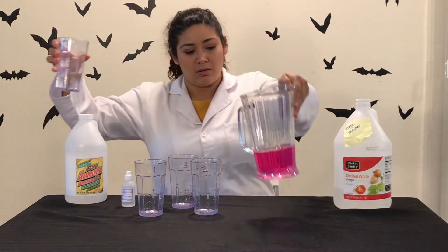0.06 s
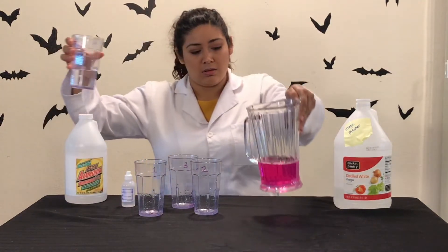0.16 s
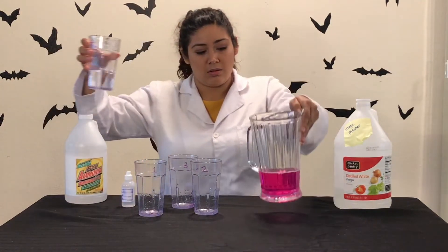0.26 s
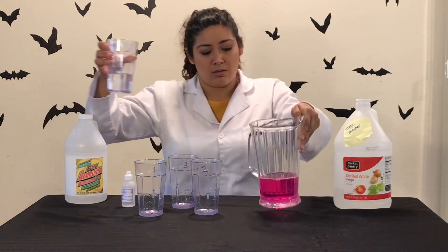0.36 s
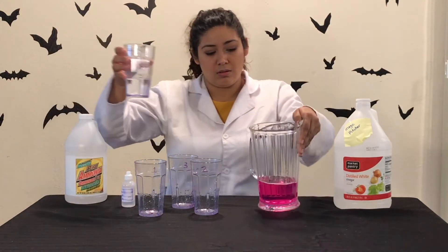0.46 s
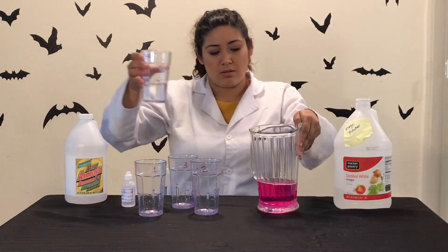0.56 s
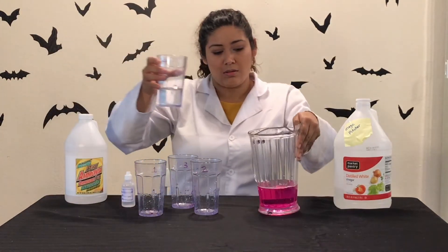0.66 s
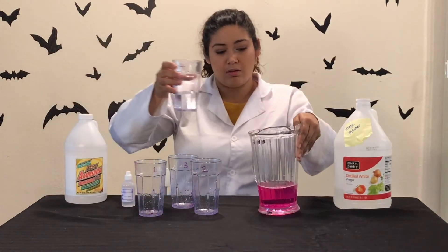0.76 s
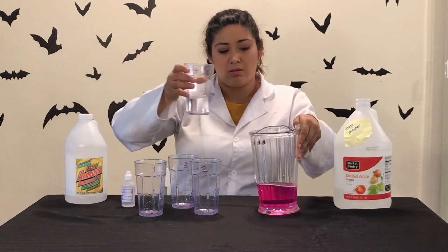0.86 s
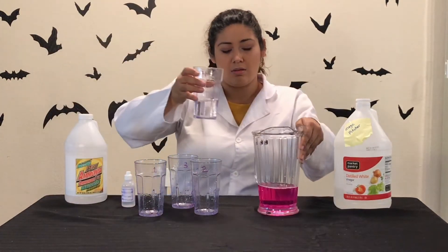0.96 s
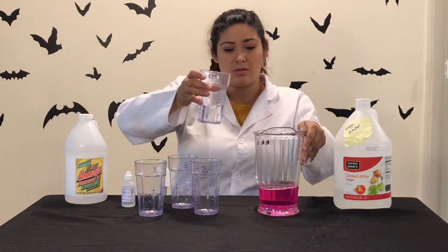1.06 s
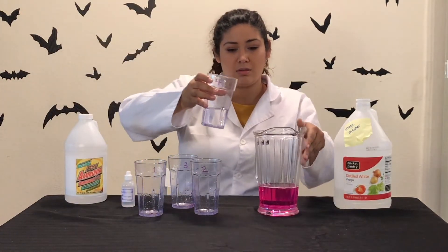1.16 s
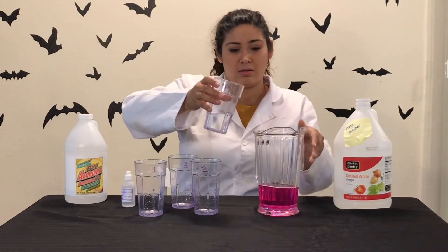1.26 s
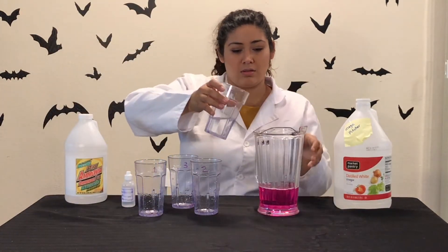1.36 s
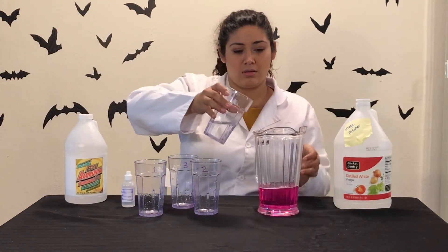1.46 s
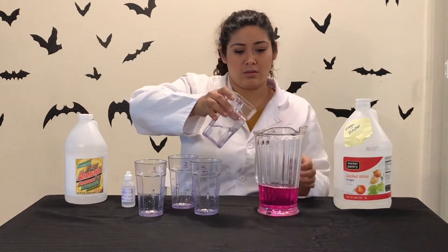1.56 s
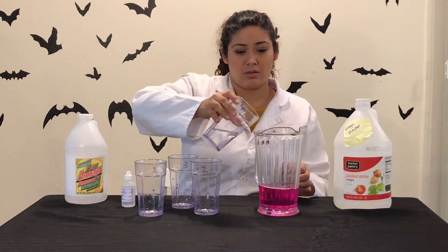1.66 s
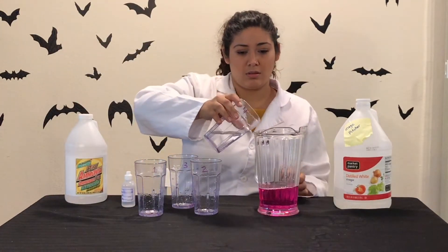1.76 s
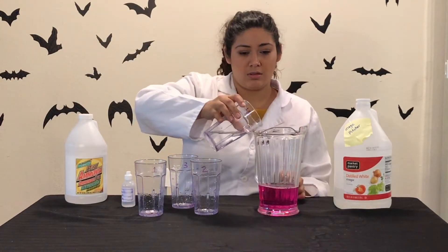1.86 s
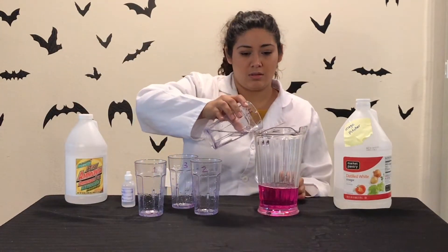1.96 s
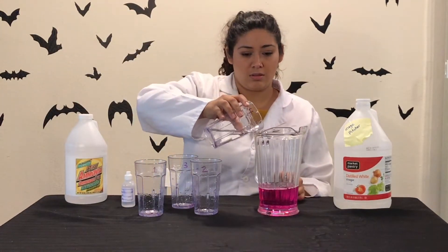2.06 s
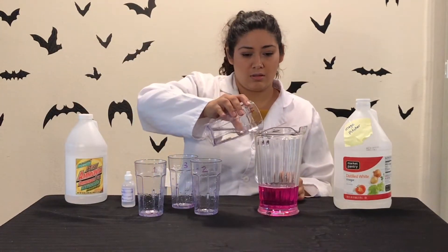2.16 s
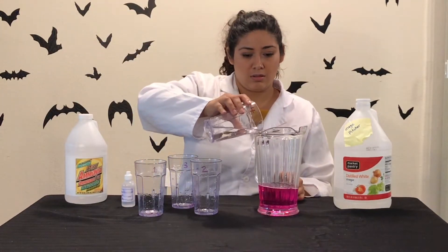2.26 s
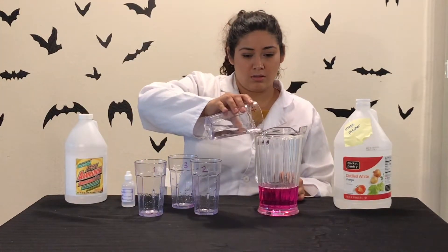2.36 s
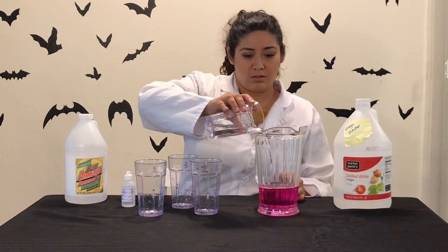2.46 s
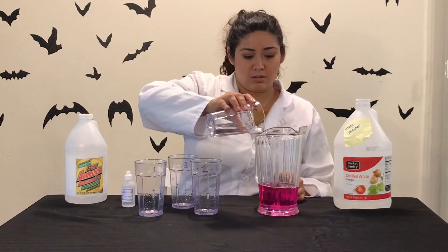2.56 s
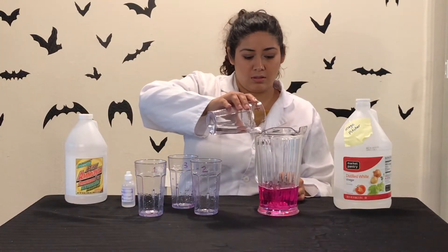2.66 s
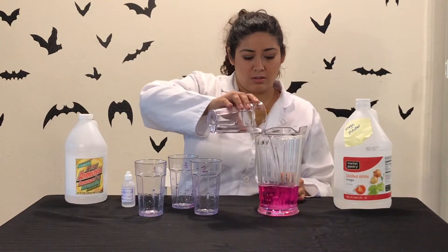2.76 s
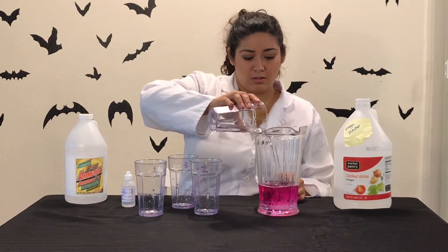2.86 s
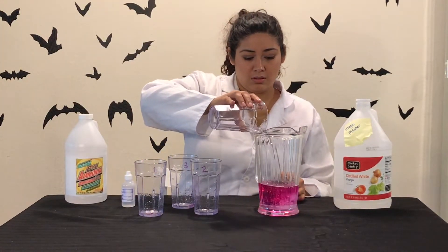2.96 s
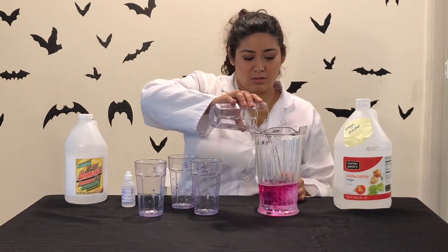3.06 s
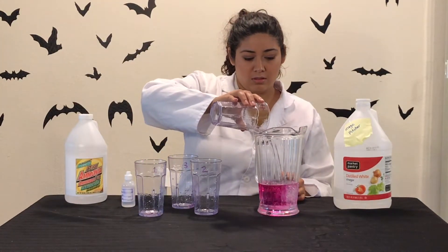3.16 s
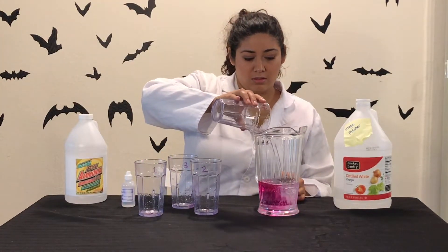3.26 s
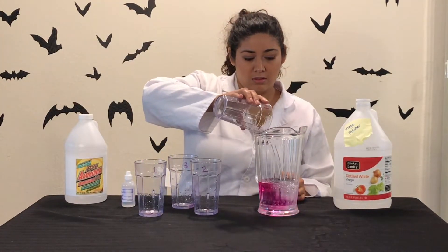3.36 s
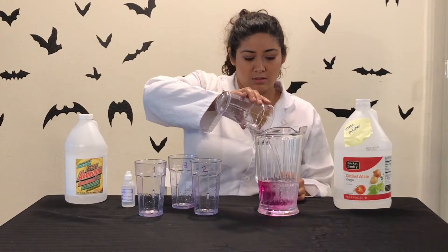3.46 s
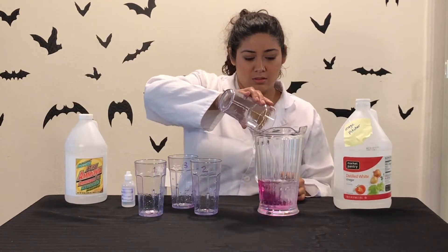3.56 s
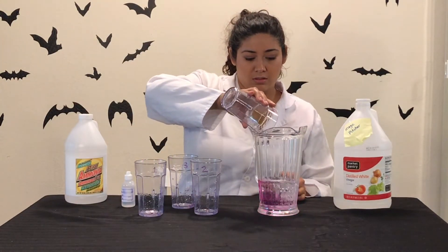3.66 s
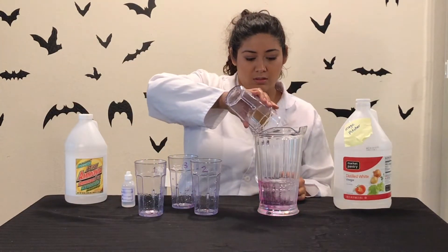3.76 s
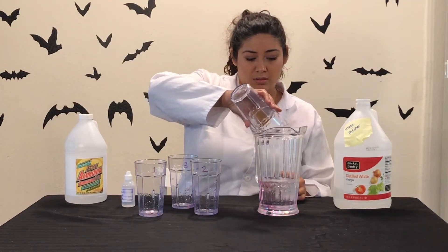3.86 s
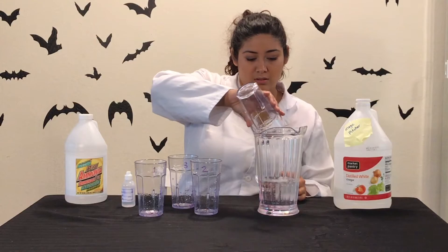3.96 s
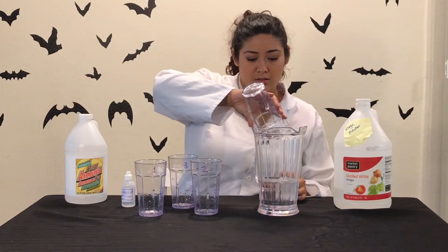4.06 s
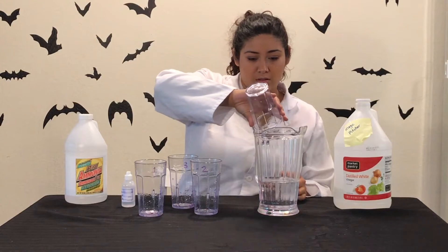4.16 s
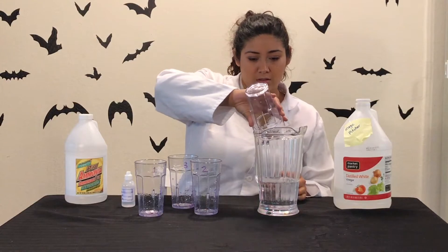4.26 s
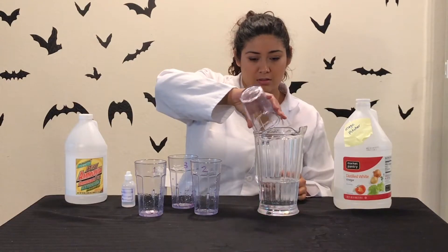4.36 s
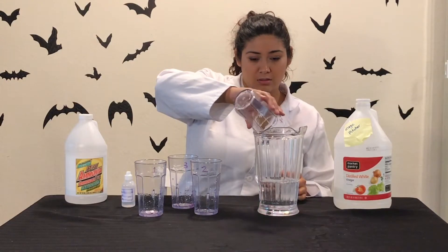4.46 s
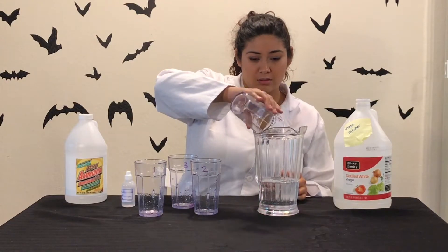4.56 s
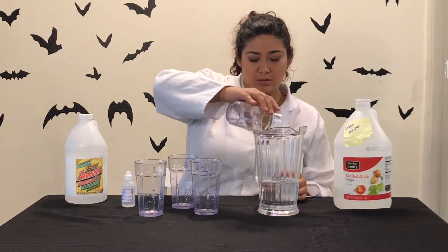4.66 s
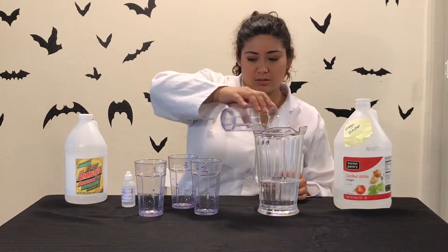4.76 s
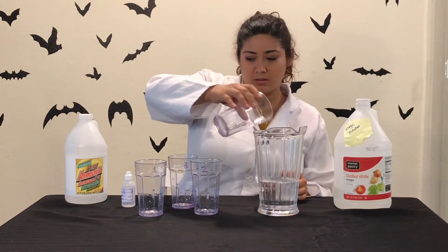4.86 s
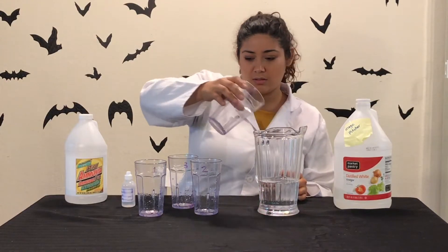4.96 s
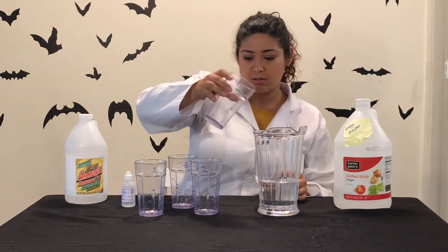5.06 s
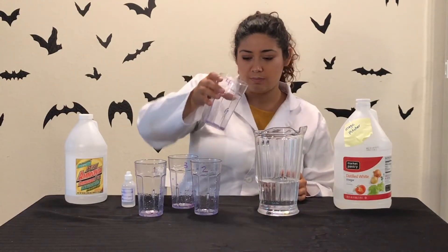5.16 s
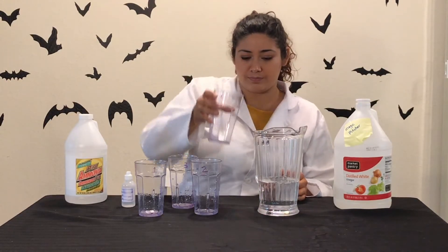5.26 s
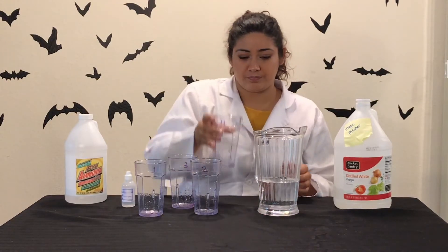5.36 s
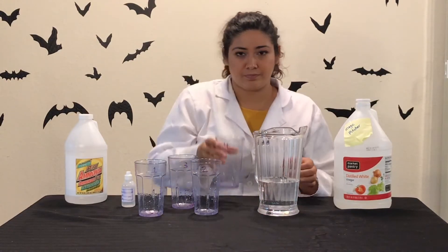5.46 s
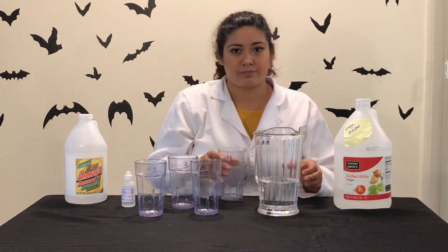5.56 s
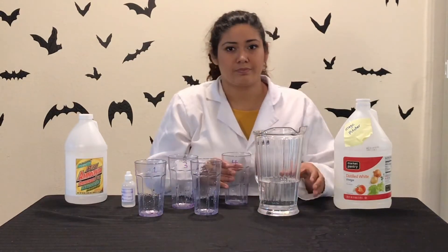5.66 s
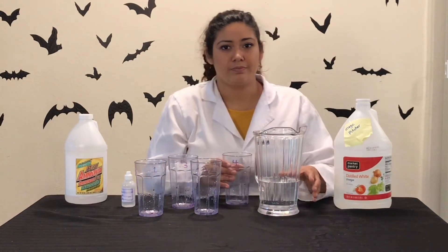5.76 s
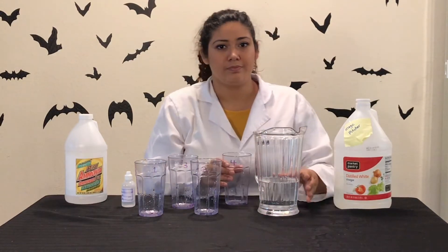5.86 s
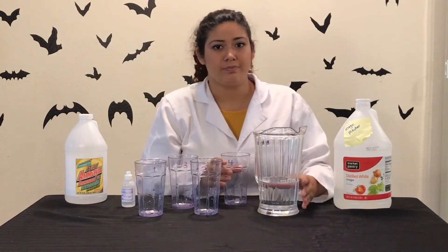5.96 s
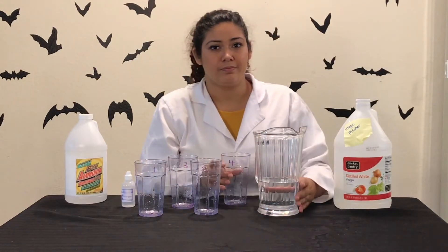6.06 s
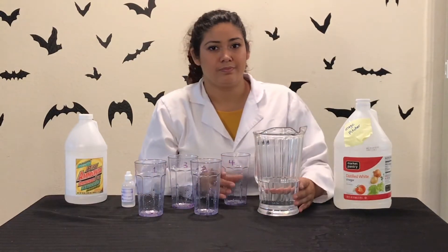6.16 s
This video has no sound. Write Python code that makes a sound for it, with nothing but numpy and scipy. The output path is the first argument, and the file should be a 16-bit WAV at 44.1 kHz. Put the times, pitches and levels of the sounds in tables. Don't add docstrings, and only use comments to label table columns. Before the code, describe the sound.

A quiet small room with hard walls, heard through a phone microphone; a faint low appliance hum with a thin wavering whine runs throughout, growing clearer while water runs. At about 0.75 seconds a plastic pitcher lands on a cloth-covered table: a loud, dull, hollow thump with quick bounces, over within a tenth of a second. Near 1.1 there is a very faint bump of handling. At 2.05 a cup taps the rim, a small high click with a lower knock. From 2.6 to 4.1 water pours in: bright splashy bubbles first, then a thinner, fizzing trickle, then a fuller burst with lower glugs around 3.7, ending in droplets. A stray drip falls at 4.4. At 4.7 the cup clicks lightly again. Faint ticks come near 5.3. At 5.73 the cup lands with a sharp hollow knock, rocks briefly and settles, leaving the hum.

```python
import sys
import numpy as np
from scipy import signal
from scipy.fft import rfft, irfft
from scipy.io import wavfile
from scipy.ndimage import uniform_filter1d

SR = 44100
rng = np.random.default_rng(int(sys.argv[2]) if len(sys.argv) > 2 else 0)


def invert_db(x):
    u = np.asarray(x, float) / 20
    return 10 ** u


def output_pcm(signal):
    pcm = np.clip(np.atleast_2d(signal).T, -1, 1) * 32767
    wavfile.write(sys.argv[1], SR, np.round(pcm).astype(np.int16))


N = 273861

# time_s, level_db
BACKGROUND = [(0.0, -60.5), (0.73, -59.5), (0.82, -55.5), (1.0, -59.5), (2.45, -60), (2.97, -53),
              (3.94, -52.5), (4.88, -58), (5.73, -59), (5.91, -54), (6.21, -57.5)]
# pitch_hz, level_db
AIR = [(20, -69), (50, -26), (100, -19), (190, -22), (240, -6), (330, -9.5), (390, -14.5), (800, -17.5),
       (1300, -21.5), (1800, -29.5), (2200, -34.5), (4500, -42), (5200, -46), (16000, -57.5)]
# multiple of the turning rate, level_db, wobble_db
MOTOR = [(2, -18.5, 2.5), (5, -1, 0.5), (6, -6, -1.5), (12, -16, 6.5), (14, -18.5, 4)]
# pitch_hz, width_hz, level_db
CASING = [(151.6, 8.5, -16), (257.2, 14.4, -4), (236, 19, -10), (1267, 24, -23)]
# centre_s, change_db, half_length_s
WHINE = [(1.13, -15, 0.08), (1.82, 7, 0.06), (3.105, 14.5, 0.1), (3.805, 9, 0.13), (4.386, 11, 0.17),
         (5.056, 10, 0.16), (6.21, 10, 0.25), (.56, 7, 0.07), (1.36, 7, .05)]
# centre_s, half_length_s
SPELLS = [(.25, .1), (.47, .04), (1.47, .05), (1.9, .06), (6.03, .08)]
# start_s, peak_db, pitch_hz, spray_db
TICKS = [(1.07, -61, 155, -12), (.117, -69, 14500, -5), (.27, -76.5, 14400, -3), (1.268, -73, 3800, 6),
         (5.273, -62, 4380, -2), (5.273, -66, 3300, -3), (5.278, -62, 3820, 4), (5.278, -69, 2620, 3),
         (5.279, -64, 9400, -3), (5.319, -70, 15300, -12), (5.318, -76, 11500, -3), (5.999, -67, 12400, 4),
         (6.133, -63, 11500, -2.5)]

# start_s, peak_db, brightness_db_per_octave
PITCHER_BLOWS = [
    (.7365, -42.5, 11),
    (.7395, -18.5, -5.5),
    (.7432, -16.5, -2),
    (.7507, -23.5, 1.5),
    (.7582, -32.5, 4.5),
    (.7733, -22, -2),
    (.7827, -28.5, -0.5),
    (.807, -44, 5),
]
# pitch_hz, level_db, t60_s
PITCHER = [(149.5, -7, 0.13), (259, -2.5, 0.055), (355, -13.5, 0.067), (520, -17, 0.06), (704, -19, 0.14),
           (830, -19, 0.17), (928, -16, 0.1), (1024, -13.5, 0.17), (1137, -7.5, 0.052), (1243, -17, 0.097),
           (1390, -14, 0.083), (1642, -15.5, 0.11), (1890, -12, 0.055), (2090, -20.5, 0.067)]
# start_s, peak_db, brightness_db_per_octave
RIM_BLOWS = [
    (2.0495, -47, 20),
    (2.0555, -49.5, -3),
    (2.060, -55, -22),
    (2.074, -58, -3),
    (2.098, -64, -3),
]
# pitch_hz, level_db, t60_s
RIM = [(1660, -40, .03), (3535, 3, 0.032), (3270, 2, 0.033), (3010, 0, 0.035), (4300, -20, .02),
       (5100, -35, .05), (7300, -46, .03), (8300, -48, 0.03)]
# start_s, peak_db, brightness_db_per_octave
WALL_BLOWS = [
    (2.050, -48, 6),
    (2.056, -48.5, -7.5),
    (2.062, -34, -0.5),
    (2.0845, -40, 6),
]
# pitch_hz, level_db, t60_s
WALL = [(1793, 5, 0.039), (1410, -11.5, 0.086), (1350, -18, 0.06), (727, -12, 0.04), (542, -12, 0.045)]

# start_s, peak_db, pitch_hz, spray_db
GLUGS = [(2.646, -46, 467, 19.5), (2.679, -53, 1890, 2), (2.807, -43.5, 1400, 2), (2.829, -53.5, 1450, 16),
         (2.99, -40.5, 1520, 6), (3.007, -56, 1620, -15), (3.099, -57, 1126, -12), (3.251, -52, 1820, -6),
         (3.292, -54, 740, -12), (3.609, -49, 1460, -6), (3.658, -50, 1510, 13.5), (3.709, -50, 1900, -14),
         (3.732, -41, 629, 11), (3.757, -36, 628, 0), (3.784, -39, 1502, 7.5), (3.826, -37, 1057, -23),
         (3.839, -44, 1127, -20), (3.908, -48, 700, -21), (4.023, -35.5, 1900, -22), (2.817, -62, 1400, -7),
         (2.97, -51, 1830, -11), (2.98, -52, 1360, -8), (3.011, -47.5, 1430, -16), (3.015, -52, 2350, -2),
         (3.256, -59, 1840, -5), (3.675, -48, 1480, 6), (3.764, -41.5, 651, -11), (3.8, -47.5, 1710, 2),
         (3.83, -46, 1780, 1), (4.04, -56, 2000, -8), (4.065, -49, 2010, -3)]
# start_s, peak_db, pitch_hz, spray_db
BUBBLES = [(2.6377, -54.5, 4480, -6), (2.666, -45.5, 5560, 2), (2.6796, -37, 4240, -1.5),
           (2.7166, -40.5, 4030, 2), (2.751, -36.5, 4210, -0.5), (2.7725, -32, 5480, -0.5),
           (2.8841, -37, 4510, 4), (3.078, -54, 3530, -4), (3.0968, -42, 4400, -25), (3.123, -53, 4700, -4),
           (3.17, -50, 5280, 1), (3.226, -53, 3210, -3), (3.2513, -55, 2590, 3), (3.3094, -45, 4460, 4),
           (3.388, -46, 3430, -14), (3.437, -41, 3370, -11), (3.539, -50, 3900, -4), (3.595, -45, 5520, -3),
           (3.6524, -43, 3080, 9.5), (3.7082, -48, 2420, -2), (3.8243, -37.5, 2970, -21),
           (3.9214, -55, 2520, -5), (3.9657, -49, 5240, -13), (4.0894, -57, 3110, -11),
           (2.659, -53, 4650, 3), (2.674, -44, 4500, 12), (2.686, -44.5, 3200, 8.5), (2.7, -47, 4550, 10),
           (2.76, -47, 4170, -13), (2.785, -43.5, 5770, -1), (2.805, -56, 5300, 2), (2.97, -58, 4500, -8),
           (3.053, -59, 5140, -10), (3.063, -62, 5160, -16), (3.072, -58, 4370, -6),
           (3.134, -52, 5170, -12), (3.18, -59, 5300, -3), (3.66, -49, 2370, -5), (3.665, -43, 3300, 0),
           (3.845, -45, 3100, -7), (3.868, -48, 2920, -1), (4.095, -58, 4520, -10)]
# start_s, peak_db, pitch_hz, spray_db
MORE_BUBBLES = [(2.891, -54, 3200, 1), (2.912, -56, 3500, -9), (2.952, -57.5, 6100, -6), (2.82, -50, 5500, -3),
                (2.89, -56, 7500, -6), (3.125, -52, 4600, -2), (2.8, -52, 4300, -6), (3.172, -56, 4700, -6),
                (3.326, -47.5, 4500, -9), (3.332, -51.5, 3600, -2), (3.345, -51, 7200, -8),
                (3.366, -57, 4600, -9), (2.7, -57, 7500, -9), (3.325, -55.5, 7800, 0), (3.452, -50, 3500, -11),
                (3.46, -45, 3400, -8), (3.412, -60, 3400, -9), (3.506, -55, 5600, -2), (4.1, -53, 7300, -8),
                (3.536, -54, 5700, -6), (4, -54, 2400, -4), (3.606, -49, 5400, -4), (3.639, -46, 6900, -7),
                (3.651, -48, 7000, -6), (3.662, -55, 5430, 1), (3.655, -45, 2900, 6), (3.712, -49.5, 8200, -8),
                (3.72, -54, 7000, -13), (3.716, -58, 6100, -8), (3.746, -65, 8200, -8), (3.78, -58, 5300, -5),
                (3.782, -57, 6300, -9), (3.836, -44.5, 2950, 3), (3.878, -57, 3300, -10), (3.71, -44, 650, -1),
                (3.3, -47, 1100, 3), (4.088, -57, 1950, -11), (2.64, -64, 12700, -6), (2.656, -54, 10500, -1),
                (2.666, -54, 11600, -2), (2.918, -63, 11000, 0), (2.929, -63, 11500, -1)]
# start_s, peak_db, pitch_hz, spray_db
DROPLETS = [(2.645, -60, 7300, -1), (2.773, -29, 7140, -1.5), (2.8752, -57, 7300, -1),
            (2.888, -55, 5500, -10), (2.903, -47, 5600, -22), (2.947, -47, 7450, -15),
            (3.1286, -57, 7360, -8), (3.1486, -52, 5650, -8), (3.1658, -54, 6350, 0),
            (3.2239, -52.5, 5800, 1), (3.2733, -50, 5800, -5), (3.302, -49, 5600, -6),
            (3.3335, -41.5, 5530, -5), (3.3634, -52, 6600, 1), (3.445, -55, 5950, 0),
            (3.6016, -36, 7900, -8), (3.7085, -49, 7050, -4), (3.775, -60, 7250, -2),
            (3.9467, -42.5, 8200, -2), (3.9655, -35.5, 7300, -2), (4.004, -45, 8200, -15),
            (4.091, -59, 5550, -6), (4.4238, -55.5, 7240, 4), (5.2724, -53.5, 5730, -7),
            (5.283, -52.5, 8450, -13), (2.668, -50, 7140, 1), (2.683, -45.5, 6800, 0),
            (2.713, -53, 8300, -1), (2.73, -45, 9000, -13), (2.785, -46, 7000, 0), (2.947, -55, 8300, -11),
            (3.175, -58, 7300, -8), (3.193, -60, 8200, -7), (3.235, -54, 6100, -2), (3.29, -51, 8000, -8),
            (3.95, -49, 6600, 1), (3.975, -43, 6840, -17), (4.015, -48, 8200, -16)]
# start_s, peak_db, pitch_hz, spray_db
MIST = [(2.6353, -46, 14600, -12), (2.6542, -61, 10900, 6), (2.728, -50, 13000, 1),
        (2.7485, -45, 10700, -2), (2.7735, -39.5, 11000, -22), (2.8044, -52, 11850, 2),
        (2.8957, -50.5, 14400, -9.5), (2.9286, -40, 15000, -10), (2.9879, -64, 14900, 2),
        (3.0239, -66, 14800, 7), (3.2743, -61, 11900, 7), (3.287, -59, 13900, 7),
        (3.3292, -53, 14600, -3.5), (3.3716, -51, 14170, -0.5), (3.4985, -60, 11700, -8),
        (3.5043, -49, 12000, -17), (3.5332, -50.5, 12700, 8), (3.6514, -47.5, 10300, 10),
        (3.7901, -54, 12040, -9), (3.8226, -56, 14800, -4.5), (3.8435, -59, 11900, -11),
        (3.9513, -49, 12200, -10.5), (4.0046, -54, 11500, -1), (4.008, -64, 15400, -7),
        (3.948, -60, 15300, -5), (4.027, -62, 15200, -11), (5.283, -68, 13600, -10)]
# time_s, level_db
STREAM = [(2.62, -62.5), (2.68, -50.5), (2.87, -51), (3.0, -57.5), (3.1, -52), (3.22, -57), (3.7, -52),
          (3.97, -52.5), (4.1, -75)]
# pitch_hz, level_db
FIZZ = [(1180, -12), (2000, -2), (2980, 3), (3700, 1), (4320, -4), (6260, -11), (7190, -12), (9900, -10),
        (15800, -33)]
# start_s, level_db, centre_hz, length_ms
SHEETS = [(2.652, -56, 9950, 5.2), (2.661, -69, 14600, 40), (2.685, -67, 10900, 22),
          (2.728, -47, 9200, 5.1), (2.774, -61, 14000, 7), (2.801, -42, 8800, 4.1), (2.805, -54, 14500, 7),
          (2.89, -62, 9600, 10), (3.438, -44.5, 3900, 9.8), (3.71, -67, 11500, 6.3), (3.6, -70, 15000, 7.5),
          (4.088, -66, 4400, 9), (2.668, -59, 5780, 18), (2.677, -50, 3030, 12), (2.709, -52.5, 7000, 26),
          (3.023, -63, 8500, 28), (3.024, -69, 12800, 25), (3.275, -66, 8200, 44), (3.293, -37, 1460, 18),
          (3.32, -58, 7500, 13), (3.502, -60, 7500, 26), (3.505, -61, 14000, 34), (3.642, -53, 7300, 25),
          (3.651, -54, 14500, 13)]

# start_s, peak_db, brightness_db_per_octave
SHAKE_BLOWS = [
    (4.697, -49, 3),
    (4.6995, -44.5, -1.5),
    (4.706, -53, 9),
    (4.714, -66, -10),
    (4.724, -74.5, -20),
    (4.739, -70.5, -15),
]
# pitch_hz, level_db, t60_s
SHAKE = [(3620, 4.5, 0.03), (3330, 2.5, 0.031), (3100, -7, 0.037), (3900, -8, .03), (4600, 2, 0.022),
         (5250, -5, 0.025), (5760, -7, 0.02), (8200, -14, 0.019), (9200, -27, .016)]
# start_s, peak_db, brightness_db_per_octave
SLOSH_BLOWS = [
    (4.699, -48, 0),
    (4.712, -52, -5.5),
]
# pitch_hz, level_db, t60_s
SLOSH = [(1890, -3, 0.045), (2350, -8, 0.078), (1590, -10, 0.05), (1430, -8, 0.09), (1370, -11, 0.11),
         (910, -11, 0.05), (650, -1.5, 0.1)]
# start_s, peak_db, brightness_db_per_octave
CUP_BLOWS = [
    (5.730, -24.5, 7),
    (5.7365, -16, -2),
    (5.7495, -28, 0.5),
    (5.756, -26, 7),
    (5.769, -22, 1),
]
# pitch_hz, level_db, t60_s
CUP = [(245, -15, 0.25), (307.3, -2, 0.16), (467, -5, 0.11), (555, -8, 0.27), (653, -9.5, 0.3),
       (680, -10.5, 0.33), (740, -11.5, 0.28), (815, -10, 0.35), (968, -12.5, 0.099), (1090, -6.5, 0.09),
       (1262, -20.5, 0.22), (1400, -28, 0.079), (1550, -19.5, 0.1), (1900, -13.5, 0.042)]
# start_s, peak_db, brightness_db_per_octave
ROCK_BLOWS = [
    (5.797, -34.5, 0),
    (5.821, -29, 0),
    (5.849, -35.5, 0),
]
# pitch_hz, level_db, t60_s
HOLLOW = [(634, 1.5, 0.086), (700, -3, 0.071), (830, -5, .07), (1560, -25, 0.14)]

# time_after_sound_s, level_db
ECHO = [(0, 8), (.006, -7), (.03, -16.5), (.038, -14), (.048, -21), (.08, -31.5), (.2, -48.5)]
# pitch_hz, width_hz, depth from 0 to 1
NOTCHES = [(10300, 900, 0.55), (13900, 760, .4), (2136, 310, 0.44)]

MOTOR_HZ = 58.99
WHINE_DB, WHINE_WANDER_DB = -16.5, 2
TABLE_HZ = 340
WIDENING = .0035
SPRAY_SHORTENS = 0.3
SHEET_OCTAVES = 0.19
STREAM_END_S = 4.2
FIZZ_DB, FIZZ_RISE_S, FIZZ_PEAK_S = -65, 0.02, 3.35
FIZZ_BUILD_DB_S, FIZZ_FADE_DB_S = 19.5, 14
TREBLE_HZ, TREBLE_LOSS_DB_S = 4000, 300


def rms_one(x):
    return x / np.sqrt(np.mean(x ** 2) + 1e-20)


def in_time(rows):
    time_s, level_db = np.transpose(rows)
    return np.interp(np.arange(N) / SR, time_s, level_db)


def coloured(x, points):
    hz, db = np.transpose(points)
    grid = np.arange(len(x) // 2 + 1) * SR / len(x) + 1
    return irfft(rfft(x) * invert_db(np.interp(np.log(grid), np.log(hz), db)), len(x))


def drift(rate_hz):
    r = np.exp(-80 * np.pi * rate_hz / SR)
    noise = rng.standard_normal(N // 40 + 2002)
    slow = signal.lfilter([1], [1, -2 * r, r * r], noise)[2000:]
    return np.interp(np.arange(N) / 40, np.arange(len(slow)), rms_one(slow))


def ring(clicks, hz, t60):
    r = 10 ** (-3 / (t60 * SR))
    w = 2 * np.pi * hz / SR
    return signal.lfilter([0, np.sin(w)], [1, -2 * r * np.cos(w), r * r], clicks + 1e-18)


def high_pass(x, order, hz):
    return signal.sosfilt(signal.butter(order, hz, "high", fs=SR, output="sos"), x)


def low_pass(x, order, hz):
    return signal.sosfilt(signal.butter(order, hz, fs=SR, output="sos"), x)


def motor_whine(turn):
    t = np.arange(N) / SR
    swells_db = sum(db * np.exp(-((t - s) / half_s) ** 2) for s, db, half_s in WHINE)
    whine_db = WHINE_DB + swells_db + WHINE_WANDER_DB * drift(1.6) + 3.5 * drift(8.9)
    whine = invert_db(whine_db) * np.sin(20 * turn + 1.4 * drift(7.9))
    spells = sum(np.exp(-((t - s) / half_s) ** 4) for s, half_s in SPELLS)
    return whine + invert_db(-9 + 3 * drift(11.0)) * spells * np.sin(21 * turn + drift(7.9))


def background():
    turn = 2 * np.pi * MOTOR_HZ * np.arange(N) / SR
    out = invert_db(-2.5) * rms_one(coloured(rng.standard_normal(N), AIR))
    for hz, width, db in CASING:
        out += invert_db(db) * rms_one(ring(rng.standard_normal(N), hz, 3.04 / width))
    for multiple, db, wobble_db in MOTOR:
        level = invert_db(db + wobble_db * np.tanh(drift(5.9)))
        out += level * np.sin(round(multiple) * turn + 0.37 * drift(1.2))
    return invert_db(in_time(BACKGROUND)) * (out + motor_whine(turn))


def puff(hz, octaves, ms):
    t = np.arange(4096) / SR
    grid = np.arange(2049) * SR / 4096 + 1
    shape = np.exp(-.5 * (np.log2(grid / hz) / octaves) ** 2)
    onset = (1 - np.exp(-t / (14 / hz + 0.001))) ** 2
    fade = np.exp(-(1000 * t / ms) ** 2)
    return rms_one(irfft(rfft(rng.standard_normal(len(t))) * shape)) * onset * fade


def splashes(rows, db, cycles, rise, octaves, spray_ms):
    out = np.zeros(N + 4096)
    t = np.arange(4096) / SR
    for s, peak_db, hz, spray_db in rows:
        age = t * hz / cycles
        swell = (1 - np.exp(-6.5 * age)) ** 3 * np.exp(-np.log(1000) * age)
        tone = np.sin(2 * np.pi * hz * t * (1 + rise * (age - .3))) * swell / swell.max()
        width = octaves + WIDENING * max(peak_db + spray_db + 50, 0)
        spray = invert_db(spray_db) * puff(hz, width, spray_ms * (1000 / hz) ** SPRAY_SHORTENS)
        at = round((s - min(5.0 / hz, .005)) * SR)
        out[at:at + len(t)] += invert_db(peak_db + db) * (tone + spray)
    return out[:N]


def hands_and_cloth():
    return splashes(TICKS, -0.5, cycles=25, rise=.01, octaves=0.47, spray_ms=10.5)


def struck(blows, modes, low_hz, cut_hz, damping, rattle_db, rattle_s, focus=0.33, rattle_hz=100):
    s, db, bright_db = np.transpose(blows)
    at = (s * SR).astype(int)
    out = np.zeros(N)
    for hz, level_db, t60 in modes:
        octaves_up = np.log2(hz / modes[0][0] / 2)
        strength_db = db + level_db + bright_db * octaves_up + rng.uniform(-3, 3, len(at))
        push = rng.choice([-1, 1], len(at))
        if hz < TABLE_HZ:
            push = np.ones(len(at))
        clicks = np.zeros(N)
        clicks[at] = invert_db(strength_db) * push
        out += signal.lfilter(*signal.iirpeak(hz, focus, fs=SR), ring(clicks, hz, t60 * damping))
    t = np.arange(SR // 8) / SR
    for i, blow_db in zip(at, db):
        rattle = high_pass(rng.standard_normal(len(t)), 2, rattle_hz) * np.exp(-t / rattle_s)
        out[i:i + len(t)] += invert_db(blow_db + rattle_db) * rattle
    return low_pass(high_pass(out, 3, low_hz), 9, cut_hz)


def pitcher_set_down():
    return struck(PITCHER_BLOWS, PITCHER, 160, 1935, damping=0.72, rattle_db=-2.0, rattle_s=0.018,
                  focus=1.2, rattle_hz=890)


def first_tap():
    rim = struck(RIM_BLOWS, RIM, 330, 8500, damping=0.56, rattle_db=-17, rattle_s=0.006, focus=13.0)
    wall = struck(WALL_BLOWS, WALL, 410, 2100, damping=0.52, rattle_db=-9.5, rattle_s=0.015, focus=20.0)
    return rim + wall


def swarm(per_s, low_hz, high_hz, cycles, uneven_db):
    sizes = invert_db(uneven_db * np.minimum(rng.exponential(1, N), 4)) * rng.choice([-1, 1], N)
    born = rng.random(N) < per_s * invert_db(4 * drift(12)) / SR
    dealt = rng.integers(0, 16, N)
    out = np.zeros(N)
    for k, hz in enumerate(np.geomspace(low_hz, high_hz, 16)):
        out += ring(sizes * born * (dealt == k), hz, cycles / hz)
    return rms_one(out)


def stream():
    t = np.arange(N) / SR
    start_s = STREAM[0][0]
    running = (t > start_s) * np.clip((STREAM_END_S - t) / 0.045, 0, 1)
    churn = invert_db(in_time(STREAM) - 5.5) * swarm(1200, 658, 2160, cycles=10.0, uneven_db=3.0)
    fizz_db = FIZZ_DB - np.maximum(FIZZ_BUILD_DB_S * (FIZZ_PEAK_S - t), FIZZ_FADE_DB_S * (t - FIZZ_PEAK_S))
    fizz = rms_one(coloured(swarm(5000, 2110, 15000, cycles=28, uneven_db=5.0), FIZZ))
    fizz_rise = np.clip((t - start_s) / FIZZ_RISE_S, 0, 1)
    return running * (churn + invert_db(fizz_db) * fizz * fizz_rise)


def poured_water():
    glugs = splashes(GLUGS, 0.11, cycles=29.5, rise=0.09, octaves=0.16, spray_ms=16.6)
    bubbles = splashes(BUBBLES, -2.1, cycles=39, rise=0.036, octaves=0.22, spray_ms=9.3)
    churn_and_fizz = stream()
    more_bubbles = splashes(MORE_BUBBLES, -1.1, cycles=42, rise=0.021, octaves=0.075, spray_ms=12.3)
    return glugs + bubbles + churn_and_fizz + more_bubbles


def drops_and_mist():
    droplets = splashes(DROPLETS, -5.5, cycles=48, rise=0.026, octaves=0.14, spray_ms=17.2)
    mist = splashes(MIST, -2.7, cycles=34, rise=.02, octaves=0.14, spray_ms=12.5)
    return droplets + mist


def sheets():
    out = np.zeros(N + 4096)
    for s, db, hz, ms in SHEETS:
        at = round(s * SR)
        out[at:at + 4096] += invert_db(db) * puff(hz, SHEET_OCTAVES, ms)
    return out[:N]


def second_tap():
    click = struck(SHAKE_BLOWS, SHAKE, 400, 8600, damping=0.77, rattle_db=-16, rattle_s=0.008,
                   focus=11.0, rattle_hz=3000)
    slosh = struck(SLOSH_BLOWS, SLOSH, 400, 2600, damping=0.66, rattle_db=-20, rattle_s=0.012, focus=9.0)
    return click + slosh


def cup_set_down():
    thump = struck(CUP_BLOWS, CUP, 226, 1633, damping=0.45, rattle_db=-1.5, rattle_s=0.0087, rattle_hz=600)
    rocking = struck(ROCK_BLOWS, HOLLOW, 400, 2000, damping=0.68, rattle_db=-31.0, rattle_s=0.0046, focus=5.1)
    high_ring = struck([(5.731, -69.5, 0)], [(3550, 3, 0.07)], 3000, 3900, damping=0.715,
                       rattle_db=13.5, rattle_s=0.044)
    return thump + rocking + high_ring


def room(x):
    t = np.arange(SR // 5) / SR
    noise = rng.standard_normal(len(t))
    bass = low_pass(noise, 2, TREBLE_HZ)
    treble = (noise - bass) * invert_db(-TREBLE_LOSS_DB_S * t)
    echo = rfft((bass + treble) * invert_db(np.interp(t, *np.transpose(ECHO))))
    echo = irfft(echo / np.sqrt(uniform_filter1d(np.abs(echo) ** 2, size=14)), len(t))
    echo = echo * np.clip((.17 - t) / .04, 0, 1) * np.minimum(t / .004, 1)
    x = high_pass(x, 2, 330)
    return signal.fftconvolve(x, echo / np.sqrt(np.sum(echo ** 2)))[:N]


def scene():
    water = poured_water()
    spray = drops_and_mist() + hands_and_cloth() + sheets()
    pitcher = pitcher_set_down()
    cup = cup_set_down()
    taps = first_tap() + second_tap()
    to_room = invert_db(-2.5) * water + invert_db(-5.5) * spray + invert_db(-6.5) * pitcher + invert_db(-7.5) * cup + invert_db(-6) * taps
    direct = invert_db(-1.0) * (water + taps) + spray + pitcher + cup
    return (direct + room(to_room) + background())[None]


def top_cut(x):
    return signal.sosfilt(signal.butter(12, 16120, fs=SR, output="sos"), x)


def record(dry):
    x = high_pass(dry, 5, 46)
    x = signal.sosfilt(signal.cheby2(12, 50, 16350, fs=SR, output="sos"), x)
    for hz, width, depth in NOTCHES:
        x = x - depth * signal.lfilter(*signal.iirpeak(hz, hz / width, fs=SR), x)
    return top_cut(x)


dry = scene()
out = record(dry)
output_pcm(out)
```